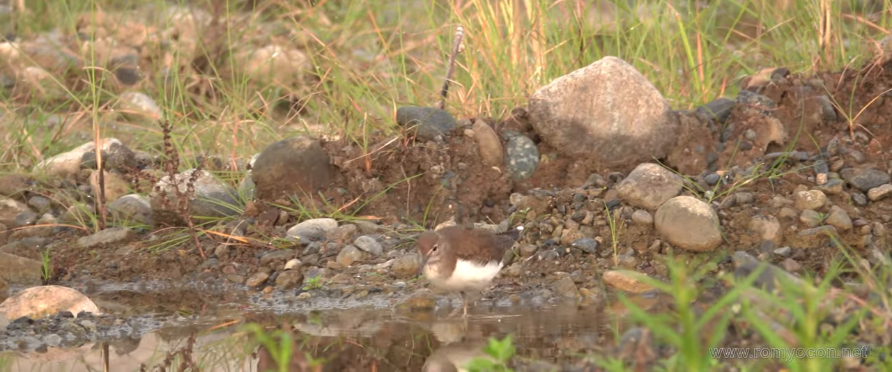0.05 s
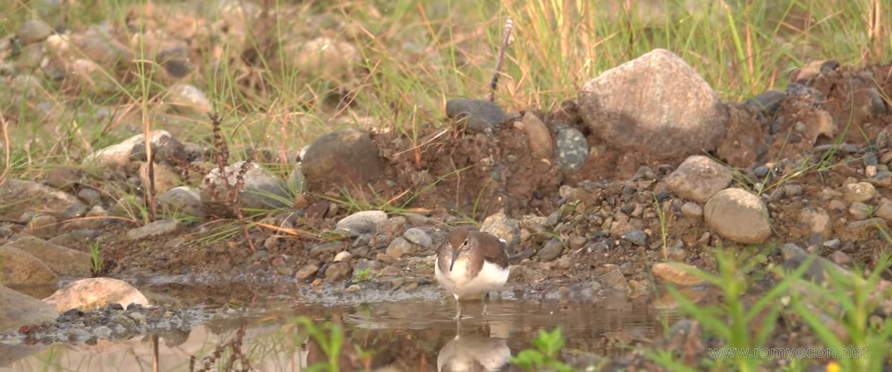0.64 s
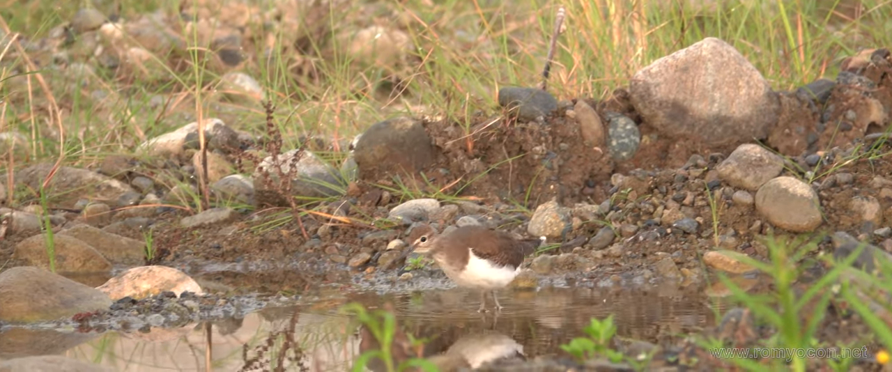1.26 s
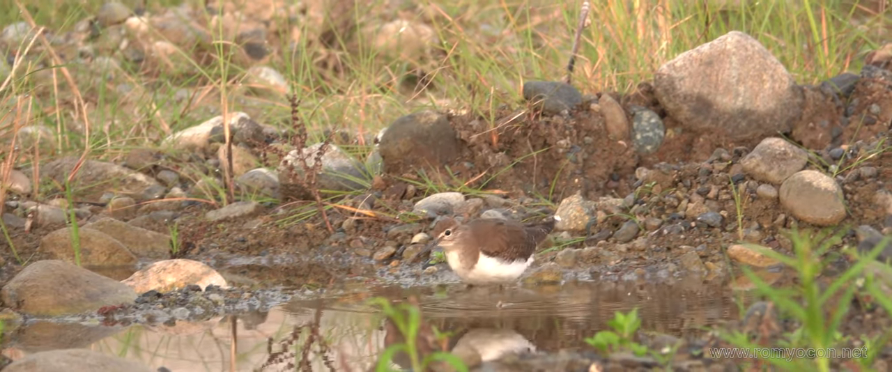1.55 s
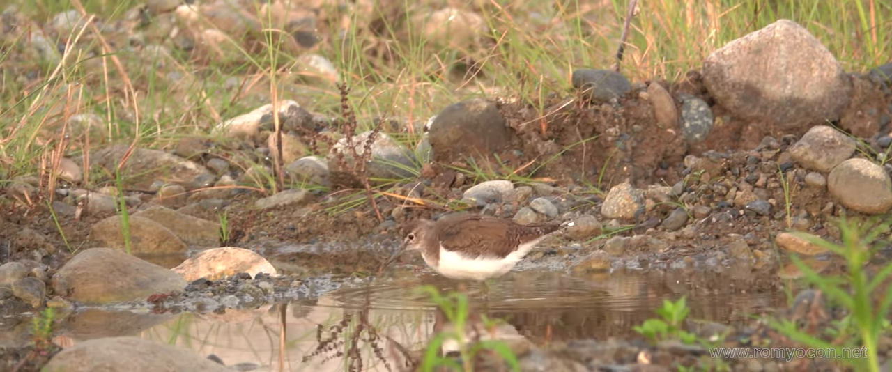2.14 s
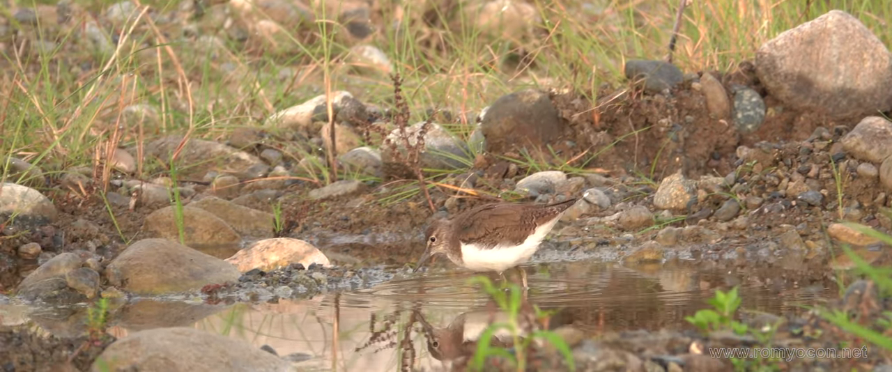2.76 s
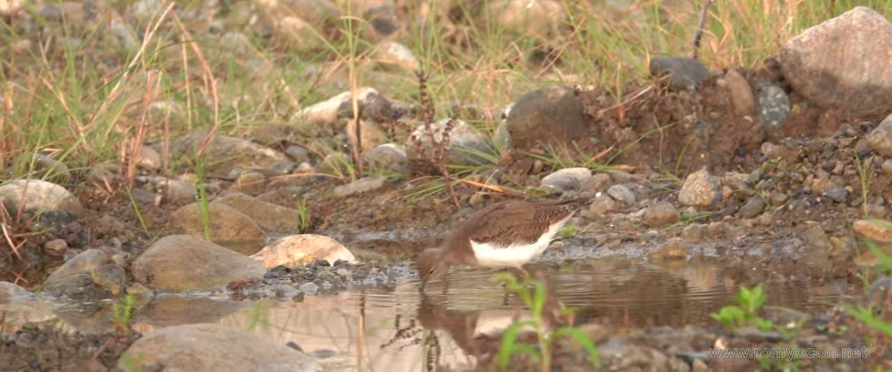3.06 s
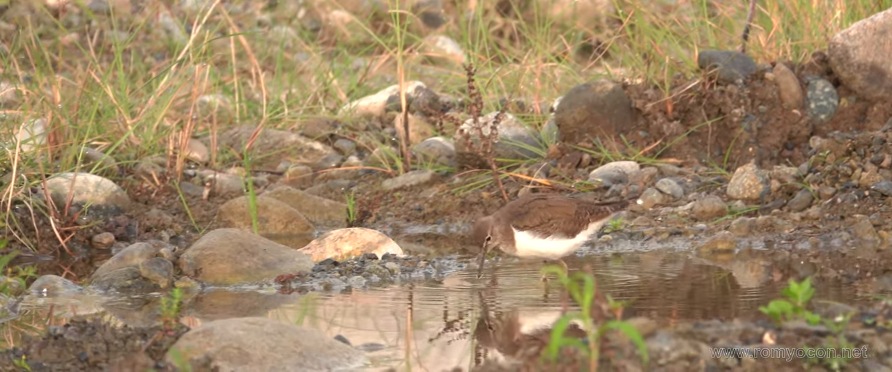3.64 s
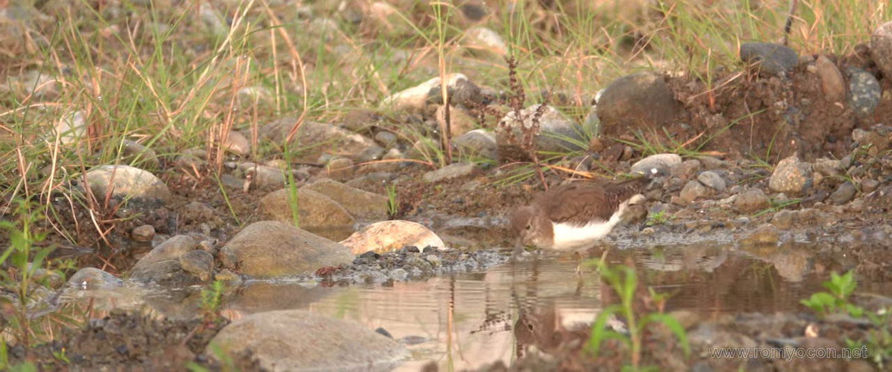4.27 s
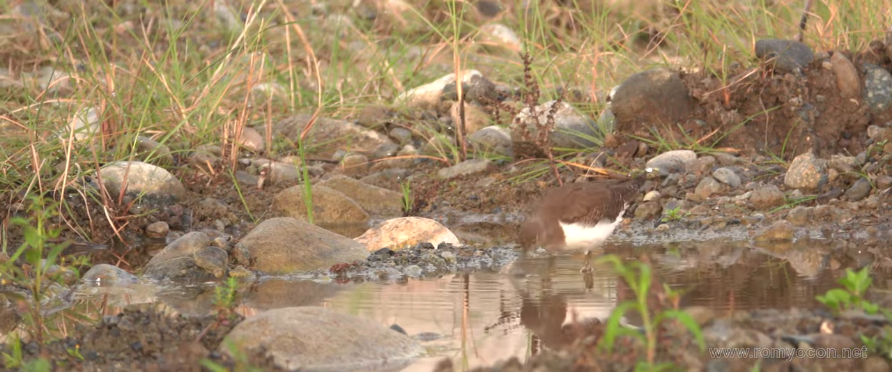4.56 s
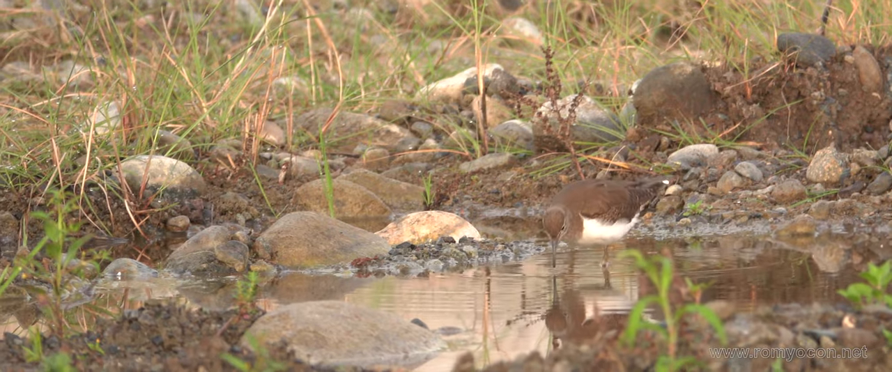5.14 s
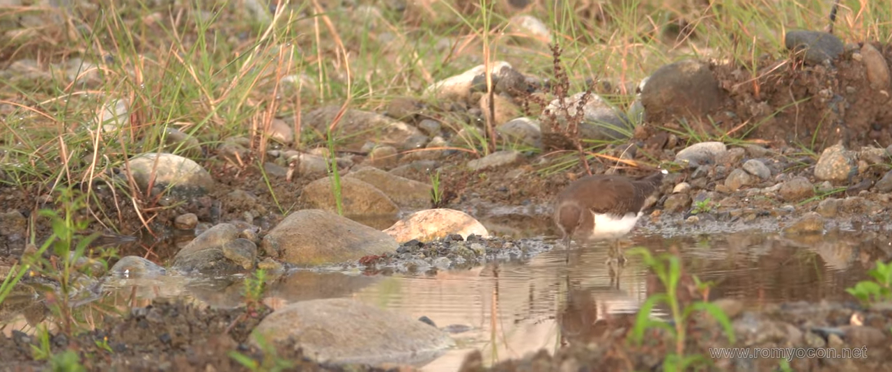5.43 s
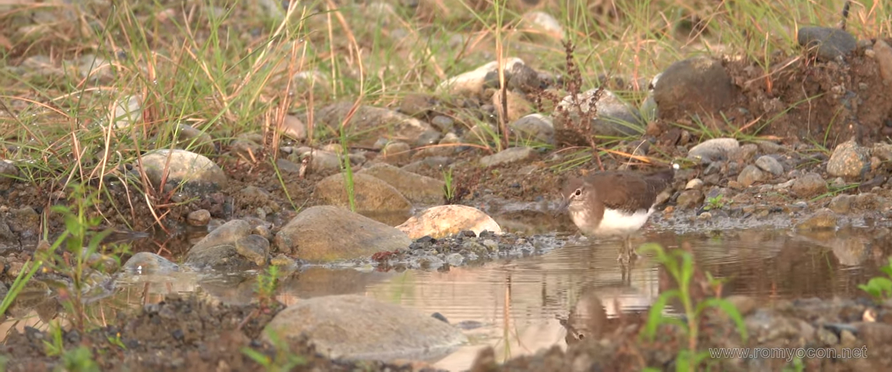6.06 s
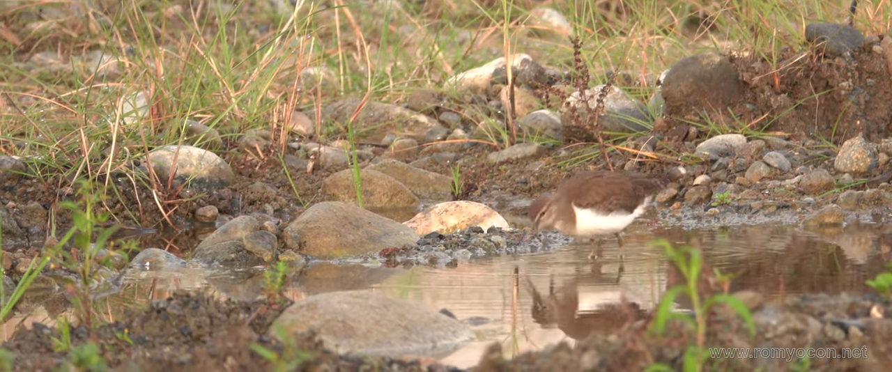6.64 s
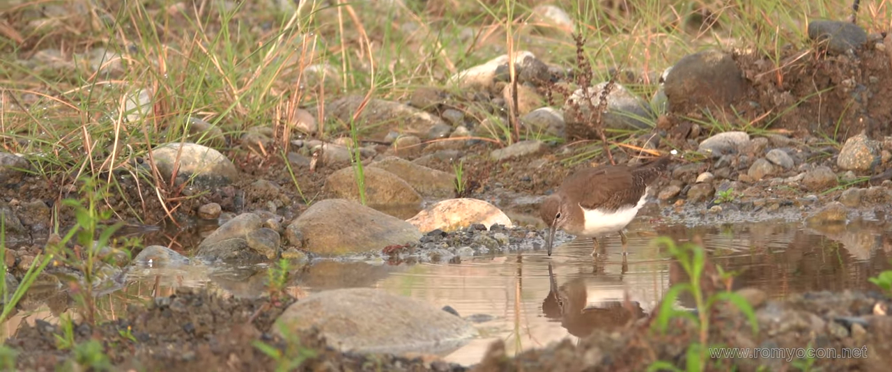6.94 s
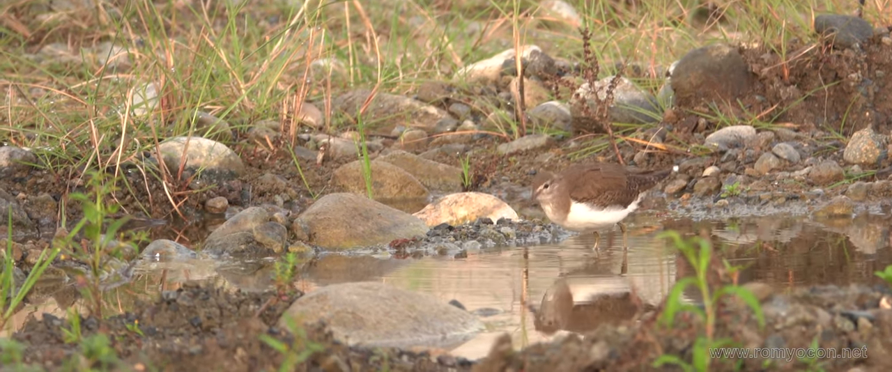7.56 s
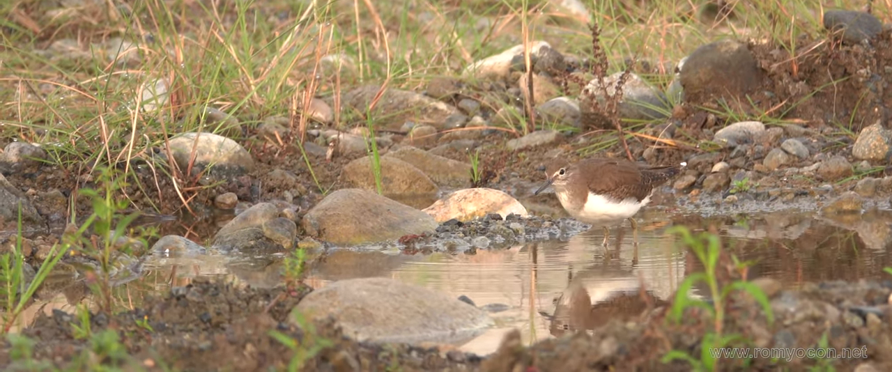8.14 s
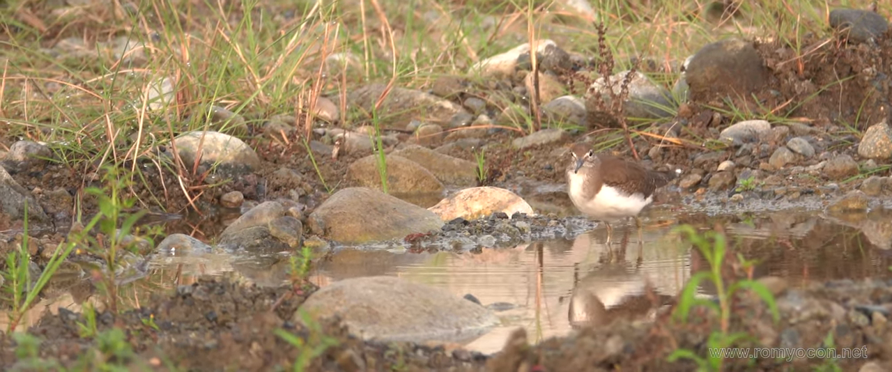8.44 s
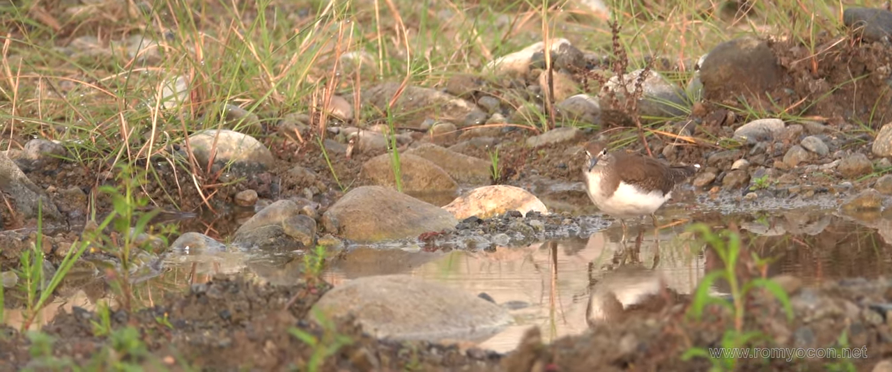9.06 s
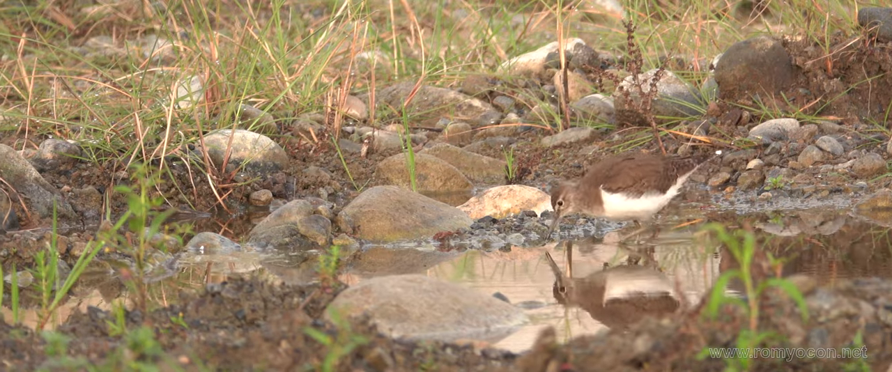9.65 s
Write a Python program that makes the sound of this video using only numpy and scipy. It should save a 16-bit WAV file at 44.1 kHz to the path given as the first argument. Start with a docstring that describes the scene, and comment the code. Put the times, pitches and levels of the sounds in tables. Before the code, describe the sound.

Low wind rumbles and flutters on the microphone at a stony river edge, easing early and growing stronger in the second half with a few soft thumps. Throughout, small birds give faint, overlapping high peeps, whistles, buzzy slurs and ticks. A larger bird flutes now and then far away, and a wading bird makes a few tiny drips. A soft outdoor hush and thin insect shrill lie behind.

```python
"""Gusts buffet the microphone while small birds peep, whistle, slur and tick over each other at a stony
river edge. Each call is a nearly pure, sliding tone from the syrinx, echoed by rocks and lightly
scattered by the open ground. A larger bird flutes far away, a distant flock chatters, and now and then
a drip rings a tiny bubble. Behind it all lie the hush of the valley and a thin band of insects."""
import sys
import numpy as np
from scipy import signal
from scipy.fft import rfft, irfft
from scipy.io import wavfile
from scipy.ndimage import uniform_filter1d, map_coordinates

SR = 44100
rng = np.random.default_rng(int(sys.argv[2]) if len(sys.argv) > 2 else 0)


def unload_audio(sound):
    """Save the sound as a 16-bit wav file, at the path given as the first command line argument."""
    columns = np.transpose(np.atleast_2d(sound))
    # keep every value between -1 and 1, then stretch to whole-number steps
    steps = np.round(np.clip(columns, -1, 1) * 32767)
    wavfile.write(sys.argv[1], SR, steps.astype(np.int16))


N = 432180
T = np.arange(N) / SR
FREQS = np.arange(N // 2 + 1) * SR / N

# tone of the valley's hush: freq_hz, density_db
HUSH_SPECTRUM = [(40, -72), (180, -75), (300, -83.5), (480, -88.5), (620, -88), (810, -84), (1000, -91),
                 (1280, -90), (1850, -93.5), (2150, -95.5), (2550, -96.5), (4200, -101), (5200, -107),
                 (9000, -112.5), (15500, -116.5)]
# the hush swells and ebbs with the breeze: time_s, gain_db
BREEZE_RIDE = [(0, .2), (1.8, .3), (3.4, -.1), (4.8, .9), (6.5, -.5), (7.6, -.1), (8.9, .5), (9.8, -.7)]
# insect shrill: centre_hz, width_hz, level_db
INSECT_BANDS = [(6125, 380, -73.5), (7790, 800, -80.5)]
# strength of the wind at the microphone: time_s, strength_db
GUST_RIDE = [(0.0, -22), (0.4, -26), (0.78, -20.4), (1.07, -31), (1.64, -25), (3.06, -32.5), (3.56, -31.0),
             (3.91, -22), (4.51, -19.5), (5.02, -25), (5.42, -22.5), (6.46, -22.5), (7.09, -18),
             (7.38, -26.5), (7.96, -16.5), (8.09, -19.5), (9.1, -18.5), (9.8, -16)]
# tone of the big eddies: freq_hz, relative_db
HEAVE_SPECTRUM = [(2, -20.5), (6, -5), (12, 4.5), (19, 4), (28, -5.5), (45, -10), (65, -28), (110, -43),
                  (600, -130)]
# tone of the small eddies: freq_hz, relative_db
FLUTTER_SPECTRUM = [(30, -7.5), (55, 7), (75, -0.5), (98, -5), (125, -12.5), (160, -21.5), (250, -31.5),
                    (500, -43), (6000, -110)]
# sharp eddies that thump the microphone: centre_s, width_s, peak_db
WIND_THUMPS = [(4.658, 0.0034, -17), (5.598, 0.0032, -17.5), (6.394, 0.0058, -16), (6.939, 0.009, -6),
               (7.203, 0.005, -12.5), (7.852, 0.0036, -17.5), (7.962, 0.0047, -9), (9.451, 0.0037, -22)]
# the distant flock's rasp: time_s, level_db
CHATTER_RIDE = [(0, -71), (.6, -71), (1.6, -89), (3.2, -92), (4.3, -69), (4.95, -72), (5.12, -61),
                (5.35, -66), (5.6, -60.5), (6.1, -71.5), (7.4, -76), (8.2, -100), (9.8, -91)]
# peeps, a quick scoop up and a long droop: start_s, length_s, top_hz, level_db
PEEP_NOTES = [(.002, 0.095, 4240, -60), (0.261, 0.17, 4770, -59.5), (.29, .09, 3900, -71),
              (0.443, 0.084, 4570, -66), (0.548, 0.21, 4160, -59), (0.664, 0.08, 4550, -66),
              (.74, .09, 4290, -67), (1.404, .14, 4770, -55), (1.493, 0.11, 4430, -71),
              (1.68, .14, 4880, -59.5), (1.717, 0.11, 5510, -64), (1.91, 0.046, 4640, -62),
              (1.925, .12, 4170, -56.5), (2.296, .08, 4380, -70), (2.354, 0.099, 3850, -65),
              (2.47, 0.074, 3310, -68), (2.643, .045, 4230, -62), (2.852, 0.13, 4140, -54),
              (2.869, 0.077, 4380, -59), (2.975, 0.12, 4250, -65), (3.105, 0.08, 4430, -60.5),
              (3.14, .14, 4880, -60.5), (3.17, 0.16, 3900, -65.5), (3.423, 0.083, 4670, -57.5),
              (3.502, 0.096, 5400, -62), (3.505, 0.13, 3900, -58), (3.784, .06, 4500, -63.5),
              (4.124, 0.086, 4280, -52), (4.16, 0.13, 4330, -61.5), (4.439, .13, 4120, -54),
              (4.522, 0.1, 4650, -61), (5.003, 0.06, 4230, -54), (5.175, 0.1, 4750, -53.5),
              (5.196, .125, 3970, -53), (5.381, .138, 4470, -55.5), (5.505, 0.13, 4310, -56.5),
              (5.526, 0.042, 4720, -55.5), (5.561, .1, 4500, -67), (5.838, 0.11, 4280, -64.5),
              (6.324, 0.079, 3760, -64.5), (6.487, 0.17, 4800, -51.5), (6.495, 0.085, 4270, -63),
              (6.67, 0.1, 3760, -66), (6.934, .07, 4800, -67), (7.117, .06, 3700, -67),
              (7.265, .11, 4240, -63), (7.587, .16, 4830, -59.5), (7.595, 0.19, 4320, -65.5),
              (7.639, .13, 4850, -57.5), (7.699, 0.21, 3390, -64), (7.882, 0.054, 4580, -63.5),
              (8.139, .1, 4690, -58.5), (8.2, 0.084, 4240, -63), (8.393, 0.069, 4180, -60.5),
              (8.626, 0.14, 4780, -60), (8.7, 0.11, 3300, -67), (8.871, 0.2, 4430, -67.5),
              (9.175, 0.16, 4860, -56.5)]
# how fast a peep droops, low ones holding almost level: top_hz, sag_hz_per_s
PEEP_SAG = [(3300, 800), (4150, 1900), (4500, 4100), (4750, 4800), (4900, 3200), (5560, 2900)]
# far fluted notes and coos: start_s, length_s, pitch_hz, glide_hz, level_db
FLUTE_NOTES = [(0.025, 0.16, 1890, 84, -72), (.269, .17, 1960, -60, -70), (0.685, 0.19, 1680, 24, -61),
               (0.933, 0.19, 1692, -30, -61.5), (1.122, 0.15, 1645, -76, -62),
               (3.898, 0.066, 1558, -50, -65), (4.22, 0.21, 1650, 40, -69), (4.44, 0.12, 1675, 94, -64),
               (4.636, 0.075, 1650, -100, -63.5), (5.027, .2, 1712, -8, -66),
               (5.154, 0.205, 1552, -71, -66), (5.398, 0.17, 1416, -100, -66), (8.297, .14, 1742, 8, -71),
               (8.522, .27, 1683, 6, -65), (8.889, 0.12, 751, 3, -60.5), (9.12, 0.27, 810, -19, -64.5)]
# rising, arching whistles: start_s, length_s, top_hz, rise_hz, crest_fraction, relative_db
WHISTLE_NOTES = [(0.164, .065, 2930, 320, 0.56, -59.5), (.44, 0.057, 2910, 200, .5, -67),
                 (0.755, 0.043, 3350, 350, 0.92, -65), (0.959, 0.11, 3350, 625, 1, -43.5),
                 (1.1, 0.091, 4070, 160, 0.55, -62), (1.143, 0.15, 4980, 450, 0.4, -62.5),
                 (4.335, 0.11, 3130, 160, 1, -63), (5.996, 0.067, 3350, 170, .95, -60.5),
                 (6.222, .064, 3670, 220, 0.52, -59), (6.486, 0.13, 3360, 120, 0.37, -61.5),
                 (7.907, 0.087, 3367, 200, 0.88, -52), (9.006, 0.094, 3330, 192, 0.5, -49)]
# raspy down-slurs; a bend over 1 drops late:
# start_s, length_s, start_hz, end_hz, bend, relative_db, swell_db, buzz_hz
SLUR_NOTES = [(.592, .092, 3680, 2880, 4, -48, 1, 15), (.622, .116, 4980, 4230, .6, -54, 1, 150),
              (1.155, .21, 4400, 3500, .55, -45, -3, 190), (3.485, .19, 5320, 4020, 2.3, -55, 0, 130),
              (3.58, .13, 4250, 4020, 1, -59, 0, 260), (4.752, .046, 3850, 3480, .6, -53, -5, 150),
              (7.31, .08, 4630, 3840, 1.5, -61, 0, 60)]
# ticks, each a tiny arch of pitch: start_s, top_hz, level_db
TICK_NOTES = [(1.076, 4570, -59), (3.435, 4700, -60), (3.662, 4020, -54), (4.074, 4300, -56),
              (4.152, 3850, -52.5), (4.222, 3580, -57), (4.464, 3920, -53), (4.746, 4250, -55),
              (4.948, 4190, -58), (5.054, 3730, -57), (5.13, 3230, -57), (5.17, 2880, -61),
              (5.651, 3280, -57.5), (7.536, 4310, -62), (8.088, 4620, -59), (8.348, 4240, -58),
              (9.12, 4250, -60)]
# drips where a wading bird picks at the water: start_s, bubble_hz, peak_db
DRIP_BUBBLES = [(1.202, 2350, -48), (1.868, 2270, -47), (2.299, 1840, -46), (4.751, 1270, -40.5),
                (7.067, 2350, -48), (7.514, 890, -43)]


def undb(db):
    """Decibels to gain."""
    return 10 ** (np.asarray(db) / 20)


def unit(x):
    """Scale to rms 1."""
    return x / np.sqrt(np.mean(x ** 2))


def add(out, start, sound):
    """Mix a sound in at its start time."""
    i = max(int(start * SR), 0)
    out[i:i + len(sound)] += sound[:N - i]


def ride(points):
    """A fader move in dB through (time_s, db) points."""
    return np.interp(T, *np.transpose(points))


def noise(gain):
    """Noise with the given gain at each frequency."""
    return irfft(rfft(rng.standard_normal(N)) * gain, N)


def colour(points):
    """An EQ curve through (freq_hz, db) points."""
    hz, db = np.transpose(points)
    return undb(np.interp(np.log(FREQS + 1e-9), np.log(hz), db))


def band(hz, width_hz):
    """A bell-shaped band of noise, rms 1."""
    return unit(noise(np.exp(-((FREQS - hz) / width_hz) ** 2)))


def drift(rate_hz, size=N):
    """Smooth random modulation with a spread near 1."""
    at = np.arange(size) * rate_hz / SR
    return map_coordinates(rng.standard_normal(int(at[-1]) + 2), [at], order=2, mode="nearest")


def progress(length_s):
    """Runs from 0 to 1 over a note."""
    return np.linspace(0, 1, int(length_s * SR))


def arch(length_s, top_hz, rise_hz, crest):
    """A pitch arc that tops out at the crest, a fraction of the way through the note."""
    return top_hz - rise_hz * (progress(length_s) / crest - 1) ** 2


def valley(sway_db=0.75):
    """The bed: a hush swaying with the breeze, and insects shrilling steadily in the grass."""
    breeze_db = ride(BREEZE_RIDE) + sway_db * drift(1.33)
    hush = noise(colour(HUSH_SPECTRUM) * np.sqrt(SR / 2)) * undb(breeze_db)
    insects = sum(band(hz, width_hz) * undb(db + 0.83 * drift(25)) for hz, width_hz, db in INSECT_BANDS)
    return hush + insects


def eddies(spectrum, steady_s):
    """Turbulent pressure, levelled over steady_s and ready for the gusts to shape."""
    turbulence = noise(colour(spectrum))
    return turbulence / np.sqrt(uniform_filter1d(turbulence ** 2, int(steady_s * SR)))


def wind(heave_trim_db=0.5, flutter_db=-34.5, flutter_growth=1.58, reference_gust_db=-20, puff_db=2):
    """Big eddies heave the diaphragm, small ones flutter in short puffs, a few hit as single thumps."""
    gust_db = ride(GUST_RIDE)
    heave = eddies(HEAVE_SPECTRUM, steady_s=0.232) * undb(gust_db + heave_trim_db)
    surge_db = flutter_growth * (gust_db - reference_gust_db)  # flutter grows faster than the wind
    flutter = eddies(FLUTTER_SPECTRUM, steady_s=.15) * undb(flutter_db + surge_db + puff_db * drift(16))
    # each thump is the low-pressure core of a passing vortex
    thumps = sum(undb(db) / (1 + ((T - when) / width) ** 2) ** 2 for when, width, db in WIND_THUMPS)
    return heave + flutter - thumps


def syrinx(hz, db, edge_s, swell_db=0, buzz_hz=0, buzz_rate_hz=195, waver_hz=16, shimmer_db=2.0):
    """One nearly pure note along a pitch path; a fast tremor of the membrane makes it buzz."""
    n = len(hz)
    t = np.arange(n) / SR
    tremor_hz = buzz_rate_hz * (1 + 0.21 * drift(119, n))
    tremor = np.sin(2 * np.pi * np.cumsum(tremor_hz) / SR)
    pitch = hz + buzz_hz * tremor + waver_hz * drift(155.6, n)
    gate = np.sin(np.pi / 2 * np.clip(np.minimum(t, t[-1] - t) / edge_s, 0, 1))
    ramp_db = 2 * swell_db * t / t[-1]  # moves by swell_db in each half of the note
    envelope = gate * undb(ramp_db + shimmer_db * drift(64.4, n))
    return undb(db) * unit(envelope * np.sin(2 * np.pi * np.cumsum(pitch) / SR))


def flock(count=70, until_s=9.3, peep_db=-72, spread_db=1.5, air_loss_db=4, low_hz=2800, range_hz=1800):
    """Birds further off: soft drooping peeps at random, and a rasp that comes and goes."""
    calls = np.zeros(N)
    for when, height, span, strength in rng.random((count, 4)):
        hz = arch(0.0497 + 0.0803 * span, low_hz + range_hz * height, rise_hz=55, crest=0.38)
        db = peep_db + spread_db * (2 * strength - 1)
        db -= air_loss_db * (height - .5)  # high calls carry less far
        add(calls, when * until_s, syrinx(hz, db, edge_s=.025, waver_hz=30, shimmer_db=3.5))
    rasp = band(3140, width_hz=960) * undb(1.8 * drift(70))
    return calls + rasp * undb(ride(CHATTER_RIDE))


def perch(out, start, note, echo_db, nearest_s=.012, furthest_s=0.056, count=2):
    """Add a call and its echoes off nearby rocks; as the pitch slides, they beat against it."""
    add(out, start, note)
    for lag in rng.uniform(nearest_s, furthest_s, count):
        add(out, start + lag, undb(echo_db) * note)


def peeps(droop_curve=1.6, scoop_hz=458, scoop_s=0.00593, edge_s=.015, swell_db=-2):
    """Thin contact calls: the pitch leaps up, then sags ever faster; each leap and fade is different."""
    out = np.zeros(N)
    variations = .5 + rng.random((len(PEEP_NOTES), 2))
    for (start, length, top_hz, db), (leap, fade) in zip(PEEP_NOTES, variations):
        t = np.arange(int(length * SR)) / SR
        sag_hz = np.interp(top_hz, *np.transpose(PEEP_SAG)) * length
        droop = sag_hz * (t / length) ** droop_curve
        scoop = leap * scoop_hz * np.exp(-t / (leap * scoop_s))
        note = syrinx(top_hz - droop - scoop, db, leap * edge_s, fade * swell_db,
                      buzz_hz=30, waver_hz=27, shimmer_db=2.5)
        perch(out, start, note, echo_db=-15.5, nearest_s=.008, furthest_s=.035, count=3)
    return out


def flutes():
    """A larger bird far away: slow, low, soft-edged notes that glide a little."""
    out = np.zeros(N)
    for start, length, pitch_hz, glide_hz, db in FLUTE_NOTES:
        hz = pitch_hz + glide_hz * (progress(length) - .5)
        add(out, start, syrinx(hz, db, edge_s=0.025, waver_hz=7.4))
    return out


def whistles(trim_db=0.8, edge_fraction=0.27):
    """Clear, arching whistles that swell as they go."""
    out = np.zeros(N)
    for start, length, top_hz, rise_hz, crest, db in WHISTLE_NOTES:
        hz = arch(length, top_hz, rise_hz, crest)
        note = syrinx(hz, db + trim_db, edge_fraction * length, swell_db=1.5)
        perch(out, start, note, echo_db=-27)
    return out


def slurs(trim_db=-0.9, edge_fraction=0.33, opening_buzz=0.58):
    """Down-slurs that turn buzzier as they fall."""
    out = np.zeros(N)
    for start, length, start_hz, end_hz, bend, db, swell_db, buzz_hz in SLUR_NOTES:
        along = progress(length)
        hz = start_hz + (end_hz - start_hz) * along ** bend
        buzz = buzz_hz * (opening_buzz + (1 - opening_buzz) * along)
        note = syrinx(hz, db + trim_db, edge_fraction * length, swell_db, buzz, waver_hz=30.4)
        perch(out, start, note, echo_db=-16)
    return out


def ticks(length_s=0.0214):
    """Very short chips among the longer calls."""
    out = np.zeros(N)
    for start, top_hz, db in TICK_NOTES:
        hz = arch(length_s, top_hz, rise_hz=168, crest=0.4)
        note = syrinx(hz, db, edge_s=.006, swell_db=-2, waver_hz=35)
        perch(out, start, note, echo_db=-24)
    return out


def drips(ring_s=0.0098, rise_fraction=0.039, decay_db=30):
    """Each drip traps a tiny bubble that rings briefly and rises in pitch."""
    out, age = np.zeros(N), progress(ring_s)
    for start, hz, db in DRIP_BUBBLES:
        cycles = hz * ring_s * (age + rise_fraction * age ** 2 / 2)
        add(out, start, np.sin(2 * np.pi * cycles) * undb(db - decay_db * age))
    return out


def scatter(send, t60_s=0.32, build_s=0.0058):
    """Stones, banks and trees return a thin, diffuse tail."""
    t = T[:SR]
    tail = rng.standard_normal(SR) * undb(-60 * t / t60_s) * (1 - np.exp(-t / build_s))
    return signal.fftconvolve(send, tail / np.sqrt(np.sum(tail ** 2)))[:N]


def scene(near_send_db=-12.5, far_send_db=-11):
    """The mono mix: birds and drips over valley and wind, the far birds a little more scattered."""
    near = peeps() + whistles() + slurs() + ticks() + drips()
    far = flutes() + flock()
    reverb = scatter(undb(near_send_db) * near + undb(far_send_db) * far)
    return (near + far + reverb + valley() + wind())[None]


def record(dry, fade_s=.01, top_hz=15720):
    """A quick fade at each end and a steep cut of the highest treble."""
    fade = np.sin(np.pi / 2 * np.clip(np.minimum(T, T[-1] - T) / fade_s, 0, 1)) ** 2
    high_cut = signal.ellip(12, .1, 90, top_hz, fs=SR, output="sos")
    return signal.sosfilt(high_cut, dry * fade)


dry = scene()
out = record(dry)
unload_audio(out)
```